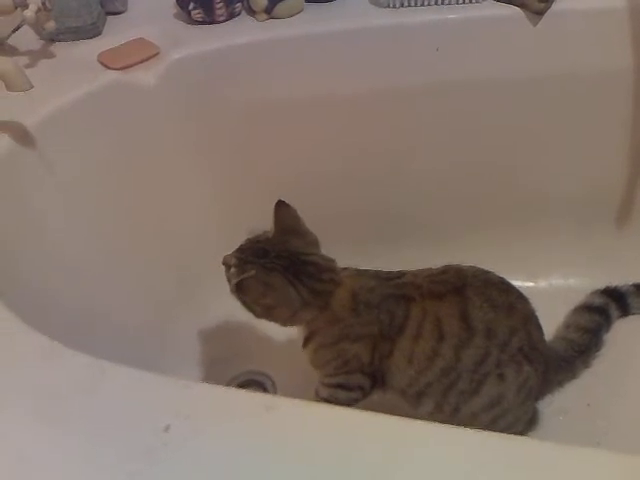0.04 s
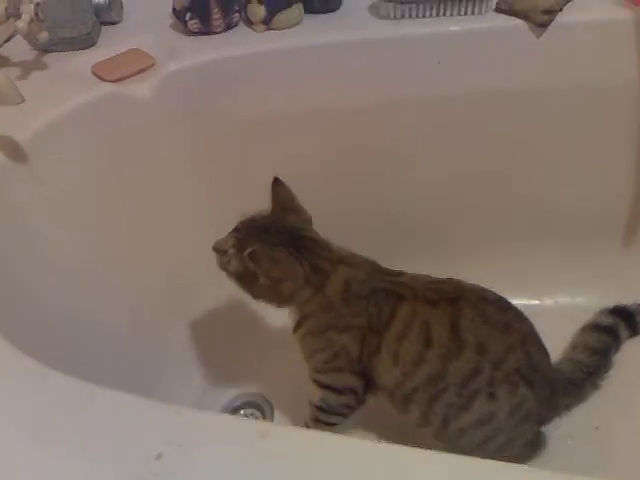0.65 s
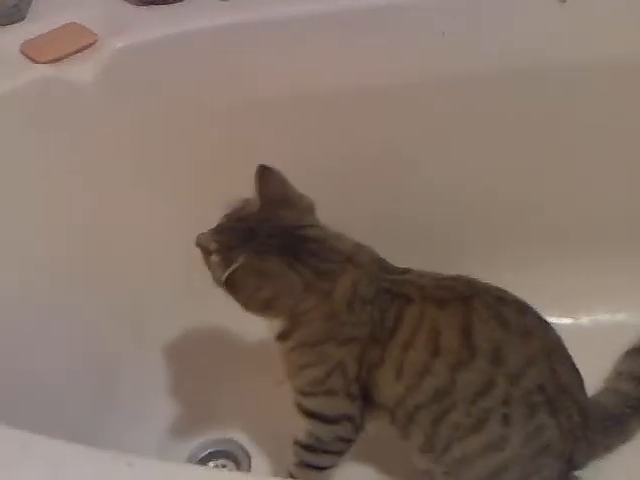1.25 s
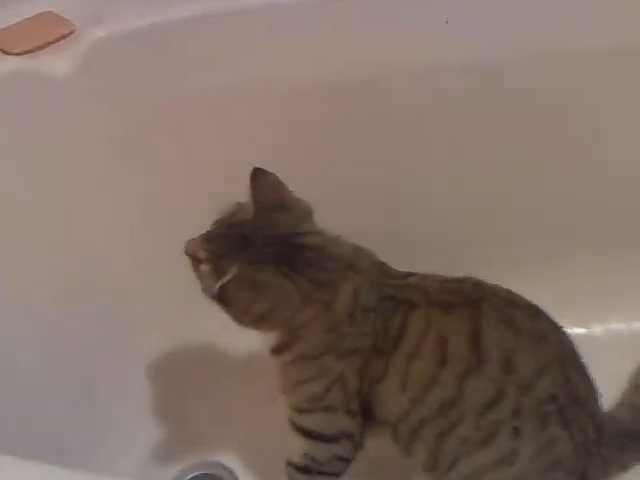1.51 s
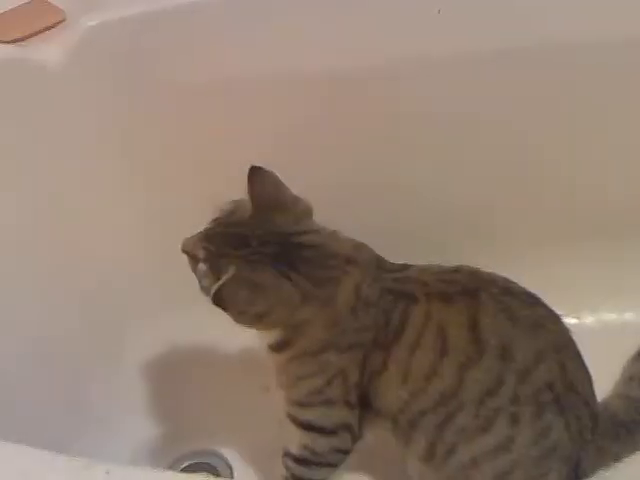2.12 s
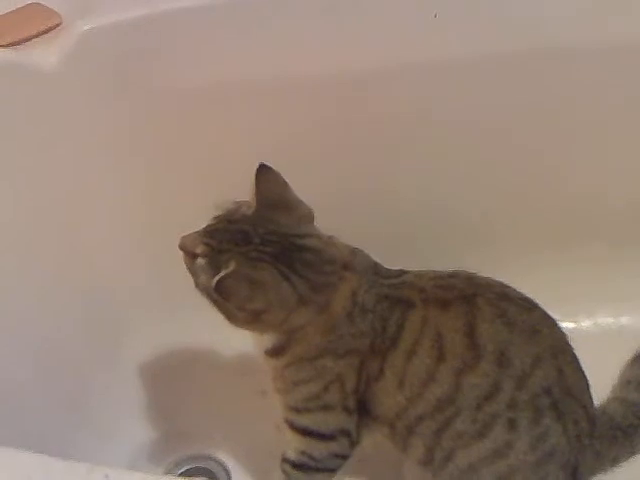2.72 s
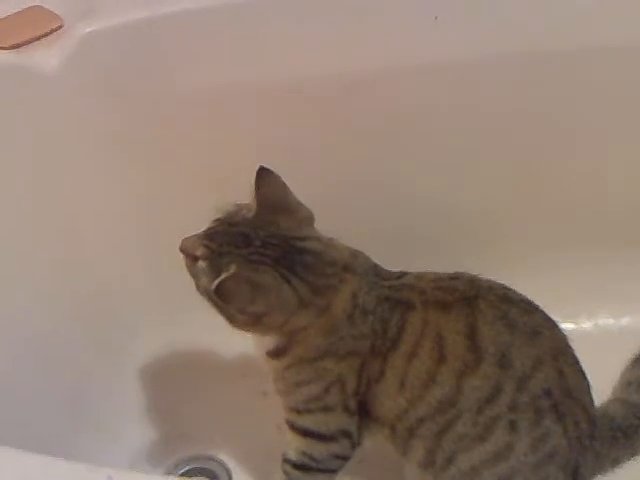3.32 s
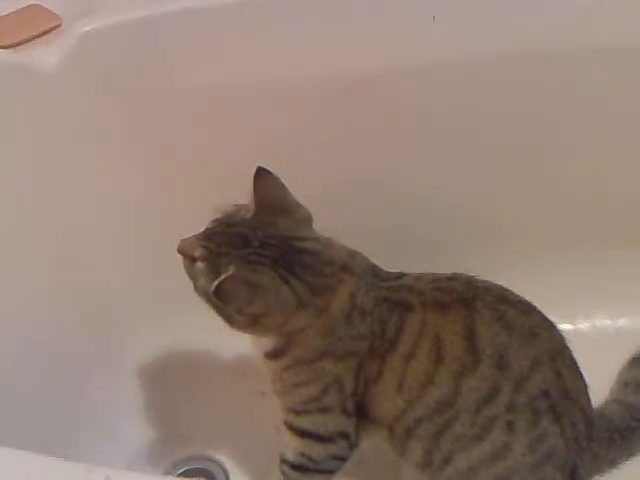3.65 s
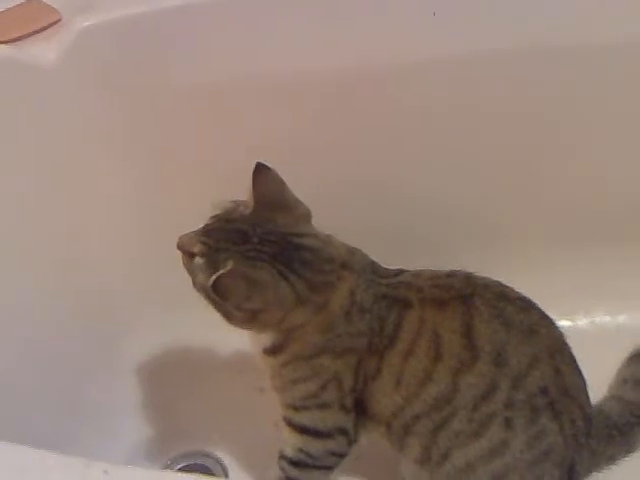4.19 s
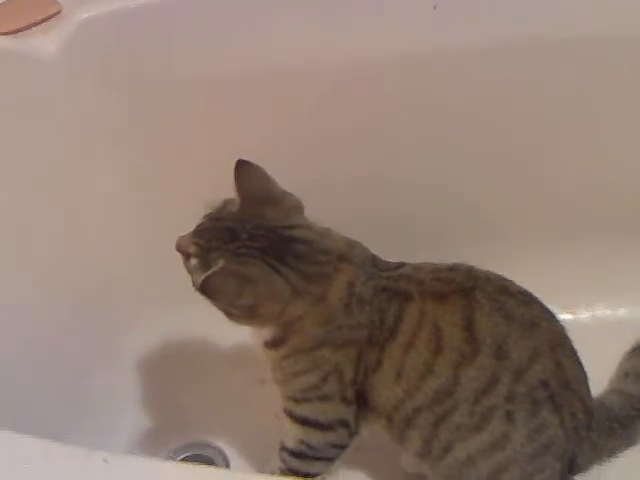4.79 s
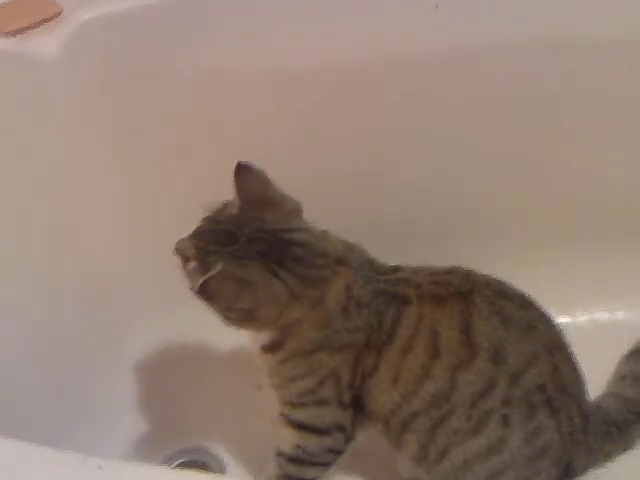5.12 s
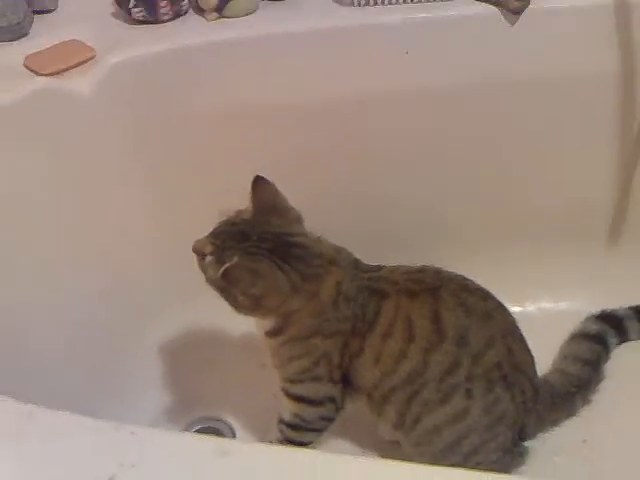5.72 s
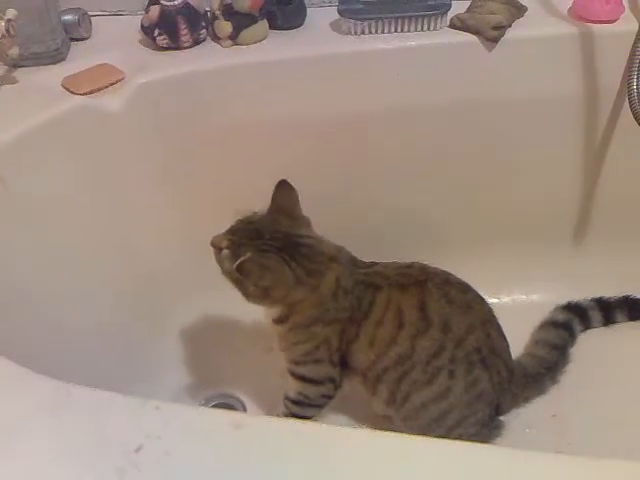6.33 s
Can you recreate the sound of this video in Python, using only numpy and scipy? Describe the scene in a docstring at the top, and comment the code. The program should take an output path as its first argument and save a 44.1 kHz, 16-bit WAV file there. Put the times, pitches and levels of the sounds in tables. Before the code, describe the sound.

A tap drips into a bathtub in a quiet bathroom, heard from close by. Faint steady hiss runs throughout, with a low rumble, a barely audible hum, a thin whine and a few tiny pips. At about 1.35 seconds two small drops land almost together with a brief spatter. A sharper single drop clicks at 1.7 seconds. The hum starts fading at around 2.6 seconds. At 3.4 seconds comes the strongest drop, a bright click with a slightly hollow plop. Two lighter drops follow at 4.9 and 5.3 seconds. Each drop is very short and dry, with only a trace of room sound and a faint low boom. The hiss swells slightly after the louder clicks and settles again. Only the quiet background remains until the end, at around 6.5 seconds.

```python
"""A tap drips into a bathtub in a quiet bathroom. Hiss, rumble, hum and a thin whine run from the
start, with faint pips. At 1.35 s a drop lands and spatters briefly; five more follow by 5.3 s.
Each is a close, dry click: a blow into the same short-lived resonances, then faint spray and boom.
After a click a noise suppressor lets the hiss swell; gain control ducks it and slowly recovers.
The hum fades from 2.6 s."""
import sys
import numpy as np
from scipy import signal
from scipy.fft import rfft, irfft, next_fast_len
from scipy.io import wavfile
from scipy.ndimage import uniform_filter1d

SR = 44100
rng = np.random.default_rng(int(sys.argv[2]) if len(sys.argv) > 2 else 0)


def to_wav(sig):
    """Store sig (one row per channel, or 1-D mono) as 16-bit WAV at the path in sys.argv[1].

    Samples outside -1..1 are clipped; the rate is SR.
    """
    pcm = np.clip(np.atleast_2d(sig), -1, 1) * 32767
    pcm = np.round(pcm).astype(np.int16)
    wavfile.write(sys.argv[1], SR, pcm.T)  # frames by channels


N = 284606
TIME_S = np.arange(N) / SR

# hiss spectrum: freq_hz, gain_db
HISS_SPECTRUM = [(76, -38), (130, -9), (169, -2), (520, -0.5), (988, -5.5), (2590, -9.5), (3430, -10),
                 (3720, -11), (14900, -10.5), (15800, -14)]
# rumble and boom spectrum: freq_hz, gain_db
RUMBLE_SPECTRUM = [(10, -18.5), (28, -9.5), (52, -1), (68, -3), (83, 2.5), (100, -8), (135, -15.5),
                   (300, -37.5)]
# clearest pips, ticks and rustles: peak_s, centre_hz, width_hz, peak_rms_db, rise_s
CLEAR_PIPS = [(.203, 1530, 129.6, -64.5, .007), (.335, 485, 58, -71, .033), (.441, 6000, 1800, -63, .0045),
              (.468, 1086, 30, -68, .02), (.815, 3430, 40, -67, .017), (1.0, 1350, 50, -74, .03),
              (1.806, 3450, 50, -67.5, .01), (1.91, 7670, 397, -68.5, .016), (3.312, 1084, 137, -69, .02),
              (3.592, 1115, 60, -65, .011), (4.185, 1376, 29.76, -72, .028), (5.885, 2032, 405, -72, .027)]
# drops: start_s, strength_db, tilt_db_per_octave, plop_db, knock_db, knock_hz, snap_db, snap_hz,
# rebound_delay_s, rebound_ratio (signed)
DROP_HITS = [(1.3476, -17, 3, 19.5, 7, 3220, 3.5, 8800, 0.00034, 0.67),
             (1.3954, -20, -5.0, 21.5, 13.5, 3320, 12.5, 8500.0, 0.00229, 0.43),
             (1.7442, 0.0, 0.57, 6, 4.5, 1499, 8.5, 8060.0, 0.00071, 0.29),
             (3.4413, 2.5, -0.5, 24.1, 8.0, 2237, 14.5, 6585, 0.0014, 0.46),
             (4.9093, -1.5, -2, 2, 6.8, 1445, -4, 8700, 0.00055, -0.24),
             (5.3125, -3.5, 0.17, 1.75, 7, 1530.0, 9, 7350, 0.00022, 0.27)]
# resonances every drop rings: pitch_hz, t60_s, gain_db
DROP_MODES = [(582.6, 0.025, -2), (1190.6, 0.015, -4.5), (1449, 0.023, -7.5), (2346, 0.015, 4.5),
              (2953, 0.017, 17), (4898, 0.004, -3.5), (7490, 0.0035, -5.5)]
# spectrum shared by all blows: freq_hz, gain_db
BLOW_SPECTRUM = [(90.0, 25.5), (450.0, 23), (850.0, 4.0), (1150.0, 16), (1700.0, 19.5), (2000.0, 9.5),
                 (3100.0, -7), (3700.0, -2), (4600.0, 6.5), (8300.0, 9.5), (9300.0, 2), (15000.0, -1.5)]
# build-up time after a blow: freq_hz, delay_s
BLOW_BUILD_UP = [(300, .0008), (1500, 0.0014), (2900, .0018), (3800, 0.001), (6500, 0.000033),
                 (9000, .0004)]
# fine spray spectrum: freq_hz, gain_db
SPRAY_SPECTRUM = [(100, -6), (300, -0.5), (600, 1.5), (2200, 1), (4000, -4), (7000, -6), (11000, -18)]
# resonances the spatter rings: pitch_hz, t60_s, gain_db
BUZZ_MODES = [(504, 0.026, -1.5), (2520, 0.014, -7.5), (3040, 0.034, -2), (6940, 0.0011, -24)]
# bathroom decay: freq_hz, t60_s
ROOM_DECAY = [(100, .6), (600, 0.34), (2000, 0.29), (8000, 0.22)]


def gain_of(db):
    """Decibels to amplitude."""
    return 10 ** (np.asarray(db) / 20)


def unit_rms(x):
    """Scales to rms 1."""
    return x / np.sqrt(np.mean(x ** 2) + 1e-20)


def curve(points, hz):
    """Interpolates (freq_hz, value) points over log frequency."""
    freq_hz, value = np.transpose(points)
    return np.interp(np.log(hz + 1), np.log(freq_hz + 1), value)


def bell(hz, centre_hz, width_octaves=.24):
    """Bell of height 1 over log frequency."""
    return np.exp(-.5 * (np.log2((hz + 1) / centre_hz) / width_octaves) ** 2)


def add(mix, start_s, sound):
    """Mixes a sound in at start_s."""
    part = mix[round(start_s * SR):][:len(sound)]
    part += sound[:len(part)]


def resonances(modes, hz):
    """Gain of damped modes, summed in power."""
    power = 0
    for pitch_hz, t60_s, db in modes:
        detuning = (hz ** 2 - pitch_hz ** 2) * t60_s * np.pi / np.log(1000) / (hz + 1)
        power += gain_of(db) ** 2 / (1 + detuning ** 2)
    return np.sqrt(power)


def minimum_phase(gain):
    """Spectrum of the promptest impulse response with this gain."""
    log_gain = np.log(np.maximum(gain, 1e-5))
    mirrored = np.concatenate([log_gain, log_gain[-2:0:-1]])
    return np.exp(np.conj(signal.hilbert(mirrored)))[:len(gain)]


def noise(colour, size=N):
    """Noise of rms 1, shaped by the gain function colour(hz)."""
    fft_size = next_fast_len(size)
    spectrum = rfft(rng.standard_normal(fft_size)) * colour(np.fft.rfftfreq(fft_size, 1 / SR))
    return unit_rms(irfft(spectrum, fft_size)[:size])


def band(centre_hz, width_hz, size=N):
    """Gaussian band of noise, rms 1."""
    return noise(lambda hz: np.exp(-.5 * ((hz - centre_hz) / width_hz) ** 2), size)


def waver(rate_hz):
    """Slow random drift, rms 1."""
    return noise(lambda hz: np.exp(-.5 * (hz / rate_hz) ** 2) * (hz > 0))


def background(hiss_db=-66, hum_fade_from_s=2.6, hum_fade_db_per_s=3.5):
    """Steady hiss, wavering rumble, fading hum, thin wavering whine."""
    hiss = gain_of(hiss_db) * noise(lambda hz: gain_of(curve(HISS_SPECTRUM, hz)))
    rumble_db = -74 + .63 * waver(rate_hz=1.6)
    rumble = gain_of(rumble_db) * noise(lambda hz: gain_of(curve(RUMBLE_SPECTRUM, hz)))
    hum_db = -78.5 - hum_fade_db_per_s * np.maximum(TIME_S - hum_fade_from_s, 0)
    hum = gain_of(hum_db) * band(centre_hz=81.8, width_hz=4)
    whine_db = -88.5 + 3 * waver(rate_hz=1)
    whine = gain_of(whine_db) * band(centre_hz=4660, width_hz=70)
    return hiss + rumble + hum + whine


def pips(faint_per_s=1.7, low_hz=1200, high_hz=8200, faint_db=-79, faint_rise_s=.018, size=16384):
    """Soft noise bands rise and fade: a few clear ones, fainter ones at random."""
    events = list(CLEAR_PIPS)
    for time_draw, pitch_draw in rng.random((30, 2))[:round(faint_per_s * N / SR)]:
        pitch_hz = low_hz * (high_hz / low_hz) ** pitch_draw
        events.append((time_draw * N / SR, pitch_hz, .03 * pitch_hz, faint_db, faint_rise_s))
    out = np.zeros(N)
    for peak_s, centre_hz, width_hz, db, rise_s in events:
        age = TIME_S[:size] / rise_s
        envelope = gain_of(db) * age * np.exp(1 - age)
        add(out, max(peak_s - rise_s, 0), envelope * band(centre_hz, width_hz, size))
    return out


def drops(plop_hz=837, rebound_rolloff_hz=8000, pivot_hz=1500, size=4096):
    """A blow and its duller rebound ring the modes, treble first. Returns clicks and spray."""
    hz = np.fft.rfftfreq(size, 1 / SR)
    body = resonances(DROP_MODES, hz) * gain_of(curve(BLOW_SPECTRUM, hz))
    lag = np.exp(-2j * np.pi * np.cumsum(curve(BLOW_BUILD_UP, hz)) * SR / size)
    puff = irfft(minimum_phase(gain_of(curve(SPRAY_SPECTRUM, hz))))
    octaves = np.log2(np.maximum(hz, BLOW_SPECTRUM[0][0]) / pivot_hz)
    clicks, spray = np.zeros(N), np.zeros(N)
    for start_s, db, tilt, plop_db, knock_db, knock_hz, snap_db, snap_hz, delay_s, ratio in DROP_HITS:
        # the landing spot sets the hollow plop, hard knock and high snap
        landing_db = (plop_db * bell(hz, plop_hz) + knock_db * bell(hz, knock_hz)
                      + snap_db * bell(hz, snap_hz))
        blow = gain_of(db + tilt * octaves + landing_db)
        rebound = 1 + ratio * np.exp(-hz / rebound_rolloff_hz - 2j * np.pi * hz * delay_s)
        spectrum = minimum_phase(body * blow) * rebound * lag
        click = np.fft.fftshift(irfft(spectrum))  # onset at mid-buffer
        add(clicks, start_s - size / 2 / SR, click * signal.windows.tukey(size, .5))
        add(spray, start_s, gain_of(db) * puff)
    return clicks, spray


def boom(level_db=-66, t60_s=.7):
    """Each drop's low end lingers as a faint rumble."""
    envelope = sum(gain_of(db - 60 * np.maximum(TIME_S - start_s, 0) / t60_s) * (TIME_S > start_s)
                   for start_s, db, *_ in DROP_HITS)
    return gain_of(level_db) * envelope * noise(lambda hz: gain_of(curve(RUMBLE_SPECTRUM, hz)))


def spatter(start_s=1.35, length_s=.054, level_db=-51, blows_per_s=2500, cutoff_hz=8000,
            surge_at_s=1.3975, surge_width_s=.003, surge_db=5, size=4096):
    """Dense tiny blows after the first drop keep a few modes buzzing, surging as the second lands."""
    time_s = start_s + np.arange(0, length_s, 1 / SR)
    hz = np.fft.rfftfreq(size, 1 / SR)
    struck = rng.random(size) < blows_per_s / SR
    blows = struck * rng.standard_normal(size)
    colour = resonances(BUZZ_MODES, hz) / np.sqrt(1 + (hz / cutoff_hz) ** 10)
    buzz = unit_rms(irfft(rfft(blows) * colour)[:len(time_s)])
    surge = np.exp(-.5 * ((time_s - surge_at_s) / surge_width_s) ** 2)
    envelope = gain_of(level_db + surge_db * surge) * signal.windows.tukey(len(time_s), .1)
    out = np.zeros(N)
    add(out, start_s, buzz * envelope)
    return out


def bathroom(sound, size=32768):
    """Diffuse tail; each band decays at its own rate."""
    hz, time_s, bands = signal.stft(rng.standard_normal(size), SR, nperseg=256)
    decay = gain_of(-60 * time_s / curve(ROOM_DECAY, hz)[:, None])
    tail = signal.istft(bands * decay, SR)[1]
    return signal.fftconvolve(sound, tail / np.linalg.norm(tail))[:N]


def scene(spray_send_db=-24, direct_send_db=-43):
    """Dry clicks over the background; their spray and a trace of direct sound feed the room. Mono."""
    bed = background() + boom()
    clicks, spray = drops()
    direct = clicks + spatter()
    tail = bathroom(gain_of(spray_send_db) * spray + gain_of(direct_send_db) * direct)
    return (direct + tail + bed + pips())[None]


def peak_hold(level_db, fall_db_per_s):
    """Instant rise, steady fall."""
    fall_db = TIME_S * fall_db_per_s
    return np.maximum.accumulate(level_db + fall_db) - fall_db


def record(dry, open_from_db=-42, lift_db_per_db=.34, open_s=.0034, close_db_per_s=42,
           duck_from_db=-31, max_duck_db=2, recover_db_per_s=19, cutoff_hz=15950):
    """Noise suppressor opens on clicks; gain control ducks and recovers; soft overload; low-pass."""
    level_db = 10 * np.log10(np.abs(uniform_filter1d(dry[0] ** 2, size=128)) + 1e-12)
    lift_db = peak_hold(lift_db_per_db * np.maximum(level_db - open_from_db, 0), close_db_per_s)
    pole = np.exp(-1 / (open_s * SR))
    lift_db = signal.lfilter([1 - pole], [1, -pole], lift_db)
    duck_db = np.clip(peak_hold(level_db, recover_db_per_s) - duck_from_db, 0, max_duck_db)
    levelled = dry * gain_of(lift_db - duck_db)
    clipped = levelled / (1 + levelled ** 8) ** (1 / 8)
    lowpass = signal.firwin(511, cutoff_hz, window=("kaiser", 9), fs=SR)
    return signal.oaconvolve(clipped, lowpass[None], "same")


dry = scene()
out = record(dry)
to_wav(out)
```